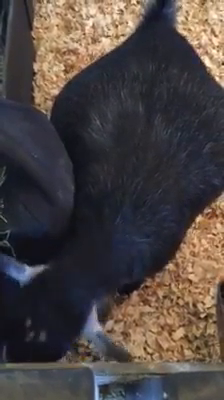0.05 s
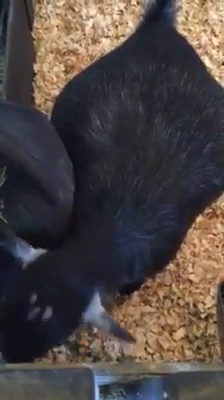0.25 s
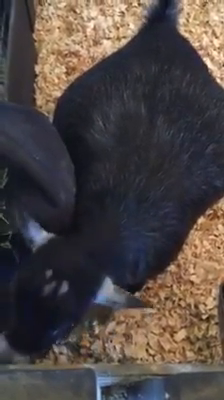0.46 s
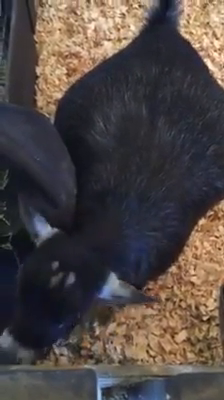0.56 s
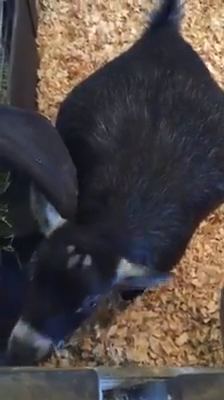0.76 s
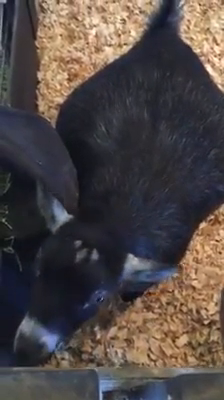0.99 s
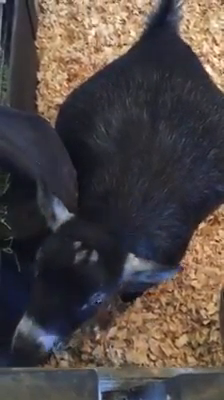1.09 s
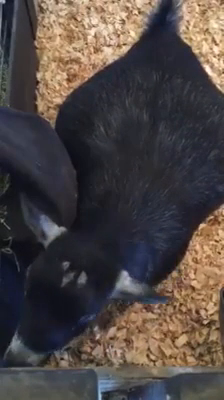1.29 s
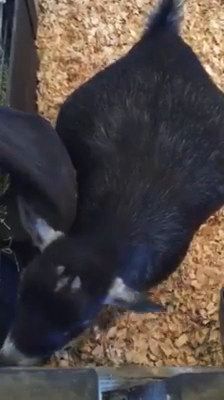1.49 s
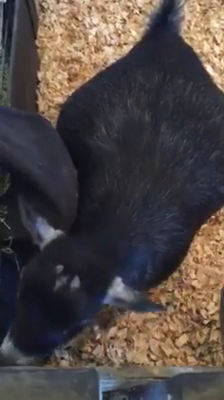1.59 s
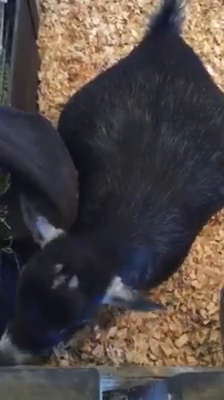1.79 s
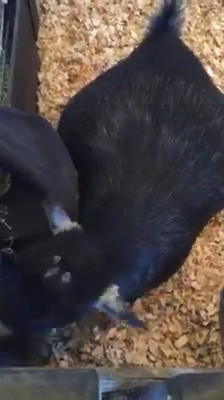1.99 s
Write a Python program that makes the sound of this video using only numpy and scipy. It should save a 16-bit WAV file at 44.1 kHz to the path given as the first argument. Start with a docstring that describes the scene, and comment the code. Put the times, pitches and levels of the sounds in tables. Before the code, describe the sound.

One loud, rough goat bleat sounds near the microphone in a small, quiet pen. The animal first shuffles dully in its bedding, then its voice rises from the nose into three hard surges, followed by a small tick.

```python
"""Goat bleat in a small pen

One harsh, close bleat: snaps of the vocal folds and puffs of air start as a creaky hum through the nose,
then the mouth opens and the voice shakes in three hard surges. Dull bumps, rustling wood shavings and
one sharp tick surround it, over a bed of still air. The pen rings briefly with the voice and shavings."""
import sys
import numpy as np
from scipy import signal
from scipy.fft import rfft, irfft
from scipy.io import wavfile
from scipy.ndimage import uniform_filter1d

SR = 44100
rng = np.random.default_rng(int(sys.argv[2]) if len(sys.argv) > 2 else 0)


def waveform_to_disk(signal):
    """Save audio, clipped to [-1, 1], as 16-bit WAV at the path in sys.argv[1]."""
    frames = np.transpose(np.atleast_2d(signal))
    scaled = np.clip(frames, -1, 1) * 32767
    samples = np.round(scaled).astype(np.int16)
    wavfile.write(sys.argv[1], SR, samples)


N = 90272
T = np.arange(N) / SR

# EQ of the still air: f/Hz, relative level/dB
AIR_EQ = [(25, -38), (60, -4.5), (95, 1), (150, -9.5), (230, -13.5), (420, -25.5), (3000, -31), (5000, -38),
          (15000, -46)]
# rustles of the bedding: t/s, rise/s, decay/s, level/dB
RUSTLES = [(0, 0.01, .13, -66), (.085, 0.085, 0.011, -60.5), (.43, 0.054, 0.036, -61),
           (.965, 0.0074, 0.08, -59)]
# their EQ: f/Hz, relative level/dB
RUSTLE_EQ = [(100, 3), (600, 6), (1250, -1.5), (1800, 4.5), (2100, -1), (3100, 1.5), (5500, -11.5),
             (9000, -22), (15000, -17)]
# bright scuffs: t/s, rise/s, decay/s, level/dB
SCUFFS = [(.964, 0.003, 0.012, -46.5), (2.0195, 0.0012, 0.0033, -43), (2.028, 0.019, 0.012, -46.5)]
# their EQ: f/Hz, relative level/dB
SCUFF_EQ = [(400, -23), (1500, 2.5), (3500, -3.5), (6000, -0.5), (9500, -3.5), (15000, -14)]
# slaps off nearby boards: delay/s, gain
BOARD_ECHOES = [(.0029, 0.13), (.0037, -.25), (.0094, .2)]
# decay of the pen's tail: f/Hz, t60/s
PEN_T60 = [(160, .3), (600, 1), (990, 0.5), (2500, .48), (6000, .9), (14000, 0.02)]
# EQ of that tail: f/Hz, relative level/dB
PEN_EQ = [(100, 9), (780, -2), (990, 6), (1200, -1.5), (2600, -1), (6000, -15), (14000, 18)]
# dull bumps and shuffles: t/s, rise/s, decay/s, f/Hz, level before the band-pass/dB
BUMPS = [(0.025, 0.037, 0.019, 135, -49), (.335, 0.024, 0.046, 153.4, -45), (.38, 0.18, .1, 97, -53.5),
         (0.645, 0.07, 0.05, 168.4, -42), (0.95, 0.0045, 0.023, 240, -39.5),
         (.953, 0.0058, 0.035, 94.5, -47), (0.993, .005, 0.07, 249, -46), (1.655, .015, .03, 200, -47),
         (1.755, .01, .025, 190, -43), (1.951, 0.03, 0.13, 112, -44)]

# pulse rate of the vocal folds: t/s, f/Hz
PITCH = [(1.11, 90), (1.205, 116), (1.228, 156), (1.28, 153), (1.315, 172), (1.345, 163), (1.385, 167),
         (1.415, 180), (1.445, 176), (1.48, 164), (1.525, 177), (1.56, 166), (1.64, 165), (1.7, 152),
         (1.76, 112)]
# turbulent air in the voice: t/s, roughness/0-1
ROUGHNESS = [(1.06, .75), (1.1, .25), (1.2, .27), (1.26, .55), (1.3, .28), (1.37, .28), (1.41, .7),
             (1.48, .6), (1.495, .17), (1.538, .15), (1.555, .72), (1.61, .62), (1.628, .13), (1.657, .13),
             (1.675, .7), (1.73, .7), (1.755, .28), (1.79, .55)]
# faders of the nasal voice: t/s, hum/dB, nasal resonance/dB, rasp/dB
NOSE = [(1.06, -57, -61, -56), (1.09, -55, -48, -56.5), (1.102, -43.5, -45.5, -53.5),
        (1.15, -45.5, -54, -51), (1.19, -46.5, -44, -51), (1.198, -45.5, -57, -41),
        (1.228, -44.5, -34.5, -42.5), (1.268, -49, -54, -45), (1.29, -44, -45, -41),
        (1.338, -45, -40, -37.8), (1.405, -45, -44.5, -40.5), (1.428, -42, -52, -40)]
# EQ of the hum: f/Hz, relative level/dB
HUM_EQ = [(60, -28), (110, -15), (170, -6.5), (240, -6), (335, -1), (365, 2.5), (405, -13), (455, -37),
          (510, -8.5), (640, -20), (820, -10), (1400, -80)]
# EQ of the nasal rasp: f/Hz, relative level/dB
NOSE_RASP_EQ = [(450, -45), (900, -22), (1620, 5), (2200, -2), (2550, -2.5), (2850, 6.5), (3450, 2),
                (3950, 8), (4400, 1), (5200, 0.5), (7400, -1.5), (7900, -11), (10000, -27), (15000, -37)]
# antiresonances of the throat: f/Hz, width/Hz
THROAT_DIPS = [(445, 45), (3380, 80), (3690, 70), (4235, 200)]
# three surges through the mouth: t/s, upper resonances/dB, first resonance/dB
SURGES = [(1.435, -41, -48), (1.467, -28, -38), (1.482, -35, -48), (1.498, -25.5, -31.5),
          (1.537, -24, -24.5), (1.556, -36, -56), (1.583, -42.5, -38), (1.615, -29.5, -42),
          (1.638, -26, -27.5), (1.654, -22, -22), (1.668, -31.5, -46), (1.684, -32, -33), (1.697, -41, -54),
          (1.728, -48, -45), (1.75, -38, -35), (1.79, -36, -35)]
# EQ of the upper resonances: f/Hz, relative level/dB
MOUTH_RING_EQ = [(400, -36), (900, -22), (1230, -1), (1600, 0), (1900, 5.5), (2080, -3), (2400, 5.5),
                 (2900, 1.5), (3400, -8), (4050, -5), (4400, -19), (8000, -58)]
# the jaw bends the first resonance: t/s, ratio to FIRST_HZ
JAW = [(1.43, 0.89), (1.52, 0.977), (1.65, 1.022), (1.79, 0.942)]
# second resonance, dropping as the lips part, then ringing with the open mouth: t/s, f/Hz, level/dB
LIPS = [(1.405, 2720, -52), (1.429, 1750, -50), (1.436, 1560, -31), (1.465, 1680, -32), (1.485, 1680, -35),
        (1.525, 1790, -29), (1.565, 1840, -52.5), (1.65, 1693, -26), (1.695, 1620, -60), (1.77, 1590, -38)]
# treble rasp of the open voice: t/s, level/dB
MOUTH_RASP = [(1.39, -54), (1.45, -45), (1.53, -39), (1.57, -48), (1.65, -37), (1.695, -49.5), (1.79, -50)]
# its EQ: f/Hz, relative level/dB
MOUTH_RASP_EQ = [(1500, -33.5), (4000, 6.5), (4600, -7), (5200, 1.5), (6100, 4), (7000, -6.5),
                 (8000, -12.5), (9400, -11), (10500, -23.5), (12500, -19), (15000, -37)]
# low body of the open voice: t/s, level/dB
CHEST = [(1.48, -54), (1.53, -41.5), (1.56, -62), (1.62, -58), (1.655, -42), (1.7, -60), (1.745, -57),
         (1.768, -36), (1.795, -70)]
# its EQ: f/Hz, relative level/dB
CHEST_EQ = [(60, -16), (150, -8), (250, 1), (345, 0), (430, -8.5), (520, 1), (600, -7), (700, 0.5),
            (900, -8.5), (6000, -76)]
# modes of the tick: f/Hz, relative level/dB, t60/s
TICK_MODES = [(3940, -0.5, 0.013), (4900, -19, 0.034)]

CREAK_HZ = 165  # below this pulse rate the folds lose their rhythm
JITTER, SHIMMER_DB = .09, 5
PUFF_RISE_CYCLES, PUFF_DECAY_CYCLES, PUFF_FLOOR = .06, .25, .22
NASAL_HZ, NASAL_WIDTH_HZ, NOSE_FADE_S = 1135, 165, .025
HOLLOW_HZ, HOLLOW_WIDTH_HZ, HOLLOW_END_S = 2210, 280, 1.305
FIRST_HZ, FIRST_WIDTH_HZ, LIPS_WIDTH_HZ = 980, 160, 280
TAIL_DB, EARLY_DB, EARLY_T60_S = -15.5, -5, .059


def amp(db):
    """Decibels to gain."""
    return 10 ** (np.asarray(db) / 20)


def unit(x):
    """Scales to rms 1."""
    return x / np.sqrt(np.mean(x ** 2) + 1e-20)


def flutter(samples):
    """Random modulation at rms 1, smoothed over this many samples."""
    return unit(uniform_filter1d(rng.standard_normal(N), size=samples))


def curve(rows, col=1):
    """One column of a time table, at every sample."""
    rows = np.array(rows)
    return np.interp(T, rows[:, 0], rows[:, col])


def fader(rows, col=1, rise=.012, release=.004):
    """Gain from a dB column, faded in before its first row and out after its last."""
    before, after = np.maximum(rows[0][0] - T, 0), np.maximum(T - rows[-1][0], 0)
    return amp(curve(rows, col)) * np.exp(-before / rise - after / release)


def swell(start, rise, decay):
    """Straight rise, then exponential fall."""
    return np.clip((T - start) / rise, 0, 1) * np.exp(-np.maximum(T - start - rise, 0) / decay)


def at_hz(points, hz):
    """Reads a spectrum table on a log-frequency axis."""
    f, value = np.transpose(points)
    return np.interp(np.log(hz + 1), np.log(f), value)


def eq(x, points, size=4096):
    """Minimum-phase EQ that keeps the power of white noise."""
    log_gain = np.log(amp(at_hz(points, abs(np.fft.fftfreq(size, 1 / SR)))))
    taps = np.fft.ifft(np.exp(np.conj(signal.hilbert(log_gain)))).real[:size // 2]
    return signal.oaconvolve(x, taps / np.linalg.norm(taps))[:N]


def resonate(x, hz, width):
    """Steep resonance that follows hz; its gain makes up for a narrow width."""
    carrier = np.exp(2j * np.pi * np.cumsum(hz * np.ones(N)) / SR)
    r = np.exp(-np.pi * width / SR)
    baseband = signal.lfilter([(1 - r) ** 2], [1, -2 * r, r * r], x / carrier + 1e-18)
    return 2 * (carrier * baseband).real / np.sqrt((1 - r) / 2)


def notch(x, hz, width):
    """An antiresonance."""
    return signal.lfilter(*signal.iirnotch(hz, hz / width, fs=SR), x)


def still_air(level_db=-57):
    """A steady bed of dark room tone."""
    return amp(level_db) * eq(rng.standard_normal(N), AIR_EQ)


def bedding(rows, tone, grain_db=3):
    """Shavings slide over each other in swells of fine grains."""
    grains = unit(rng.standard_normal(N) * amp(grain_db * flutter(120)))
    envelope = sum(amp(db) * swell(start, rise, decay) for start, rise, decay, db in rows)
    return eq(grains * envelope, tone)


def pen(x):
    """The wet signal: slaps off the nearest boards, a quick scatter and a short tail."""
    t = T[:SR]
    signs = rng.choice([-1., 1.], (2, SR))
    early, late = signs * (rng.random((2, SR)) < .15) * (t > .002)  # sparse reflections
    hz, times, bands = signal.stft(late, SR, nperseg=256)
    decay = np.exp(-np.log(1000) * times / at_hz(PEN_T60, hz)[:, None])
    tail = signal.istft(bands * decay, SR, nperseg=256)[1][:SR]
    tail_tone = amp(at_hz(PEN_EQ, np.fft.rfftfreq(SR, 1 / SR)))
    tail = irfft(rfft(tail / np.linalg.norm(tail)) * tail_tone)
    early = early * np.exp(-np.log(1000) * t / EARLY_T60_S)
    response = amp(TAIL_DB) * tail + amp(EARLY_DB) * early / np.linalg.norm(early)
    slaps = sum(gain * np.interp(T - delay, T, x) for delay, gain in BOARD_ECHOES)
    return signal.fftconvolve(x, response)[:N] + slaps


def bumps(width_hz=50, band_hz=(48, 330)):
    """Soft low thuds, each a short swell of one dull resonance."""
    out = np.zeros(N)
    for start, rise, decay, hz, db in BUMPS:
        envelope = swell(start, rise, decay)
        thud = envelope * resonate(rng.standard_normal(N), hz, width_hz)
        out += amp(db) * thud * np.linalg.norm(envelope) / np.linalg.norm(thud)
    return signal.sosfilt(signal.butter(3, band_hz, "band", fs=SR, output="sos"), out)


def vocal_folds(rough):
    """Sharp snaps, more uneven as the voice roughens, and the puff of air after each."""
    pitch = curve(PITCH)
    wobble = flutter(260) * (CREAK_HZ / pitch) ** 2
    voiced = T > NOSE[0][0] - NOSE_FADE_S
    cycles = np.cumsum(pitch * (1 + JITTER * rough * wobble) * voiced) / SR
    shimmer = amp(SHIMMER_DB * rough * rng.standard_normal(N))
    snaps = np.diff(np.floor(cycles), prepend=0) * np.sqrt(SR / pitch) * shimmer
    phase = cycles % 1
    gate = PUFF_FLOOR + (1 - np.exp(-phase / PUFF_RISE_CYCLES)) * np.exp(-phase / PUFF_DECAY_CYCLES)
    puffs = gate / np.sqrt(np.mean(gate[cycles > 0] ** 2)) * rng.standard_normal(N)
    return snaps, puffs


def nose(clean, voice, airy):
    """Hum, nasal ring and rasp; a notch near 2.2 kHz hollows their first part, then fades."""
    hum, ring, rasp = [fader(NOSE, col, NOSE_FADE_S, NOSE_FADE_S) for col in (1, 2, 3)]
    nasal = (eq(clean * hum, HUM_EQ)
             + resonate(voice * ring, NASAL_HZ, NASAL_WIDTH_HZ)
             + eq(airy * rasp, NOSE_RASP_EQ))
    notch_mix = np.clip((HOLLOW_END_S - T) / NOSE_FADE_S + .5, 0, 1)
    return notch_mix * notch(nasal, HOLLOW_HZ, HOLLOW_WIDTH_HZ) + (1 - notch_mix) * nasal


def mouth(clean, voice, airy, puffs):
    """Air hisses between the parting lips, then the open mouth rings in three surges."""
    parting = amp(-41) * swell(start=1.385, rise=.025, decay=.025)
    hiss = resonate(puffs * parting, curve(LIPS), width=1300)
    body = eq(clean * fader(CHEST), CHEST_EQ)
    first = resonate(voice * fader(SURGES, col=2), FIRST_HZ * curve(JAW), FIRST_WIDTH_HZ)
    second = resonate(voice * fader(LIPS, col=2), curve(LIPS), LIPS_WIDTH_HZ)
    upper = eq(voice * fader(SURGES), MOUTH_RING_EQ)
    rasp = eq(airy * fader(MOUTH_RASP), MOUTH_RASP_EQ)
    return hiss + body + first + second + upper + rasp


def goat():
    """The folds sound through the nose, then the mouth; the treble is airier than the bass."""
    rough = curve(ROUGHNESS)
    snaps, puffs = vocal_folds(rough)
    # three equal-power blends, from least to most breath
    clean, voice, airy = [((1 - breath) * snaps + breath * puffs) / np.hypot(1 - breath, breath)
                          for breath in (.55 * rough, rough, rough ** .55)]
    bleat = nose(clean, voice, airy) + mouth(clean, voice, airy, puffs)
    for hz, width in THROAT_DIPS:
        bleat = notch(bleat, hz, width)
    return bleat


def tick(start=2.0205, level_db=-28):
    """One small, hard tick: two bright modes that die fast."""
    t = np.maximum(T - start, 0)
    return sum(amp(level_db + db) * np.exp(-np.log(1000) * t / t60) * np.sin(2 * np.pi * hz * t)
               for hz, db, t60 in TICK_MODES)


def scene():
    """Mono mix: goat and bedding feed the pen's reverb; bumps, tick and air stay dry."""
    near = goat() + bedding(RUSTLES, RUSTLE_EQ) + bedding(SCUFFS, SCUFF_EQ)
    air = still_air()
    return (near + pen(near) + bumps() + tick() + air)[None]


def record(dry, cutoff_hz=15050):
    """A steep high cut on the whole mix."""
    high_cut = signal.firwin(511, cutoff_hz, window=("kaiser", 9), fs=SR)
    return signal.oaconvolve(dry, high_cut[None], "same")


dry = scene()
out = record(dry)
waveform_to_disk(out)
```